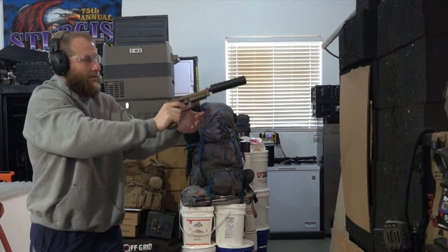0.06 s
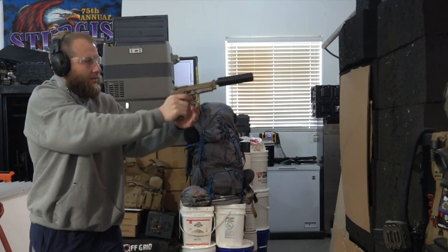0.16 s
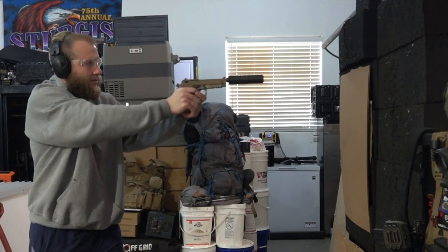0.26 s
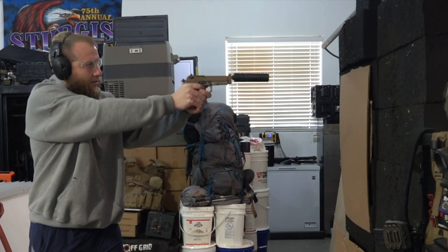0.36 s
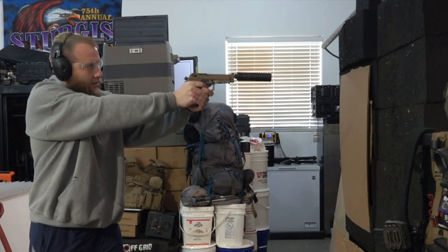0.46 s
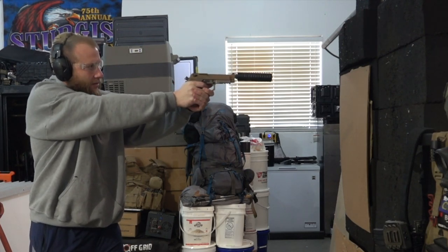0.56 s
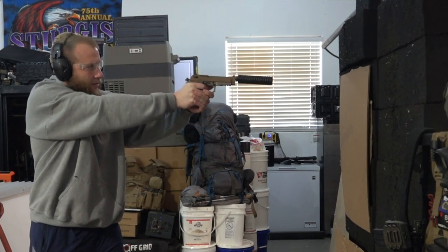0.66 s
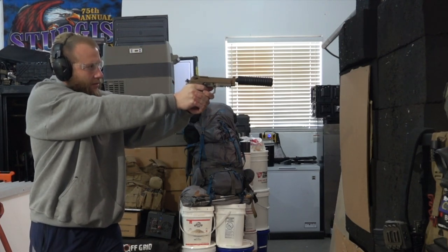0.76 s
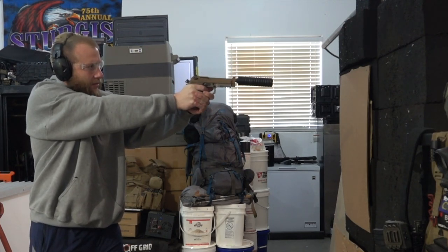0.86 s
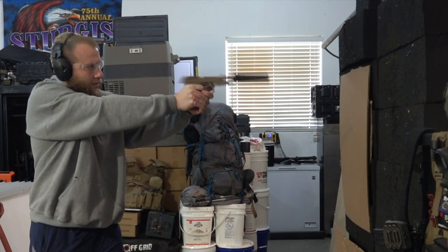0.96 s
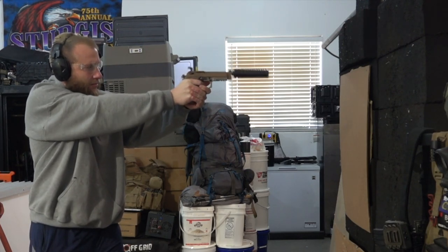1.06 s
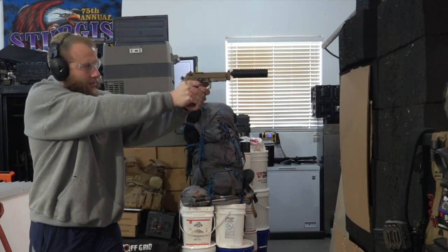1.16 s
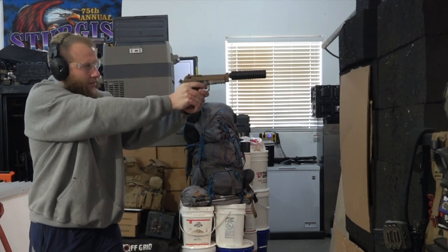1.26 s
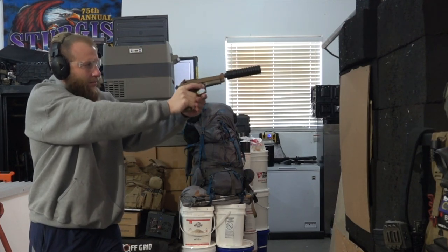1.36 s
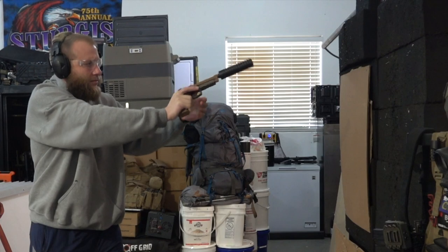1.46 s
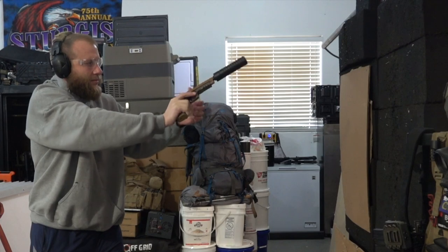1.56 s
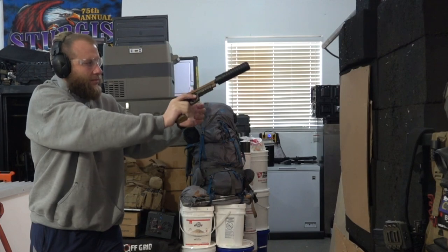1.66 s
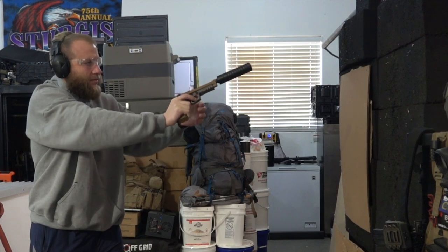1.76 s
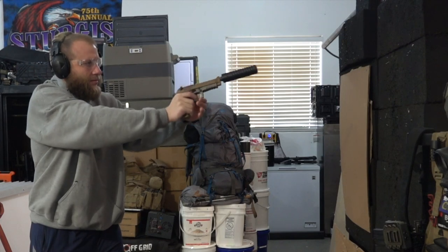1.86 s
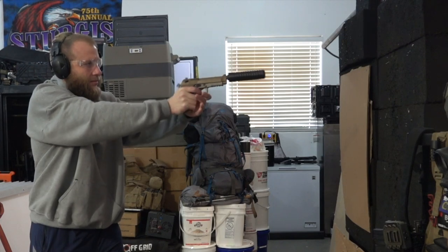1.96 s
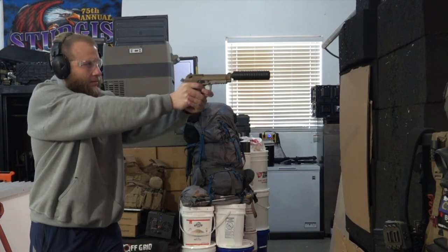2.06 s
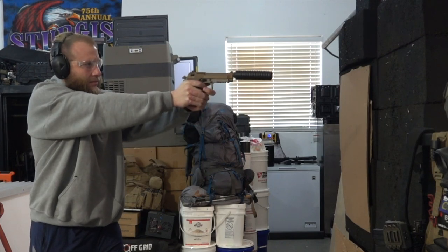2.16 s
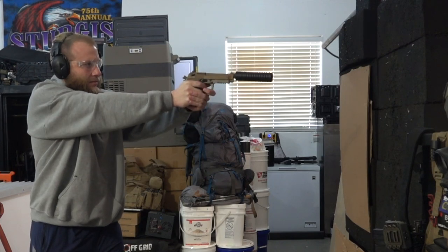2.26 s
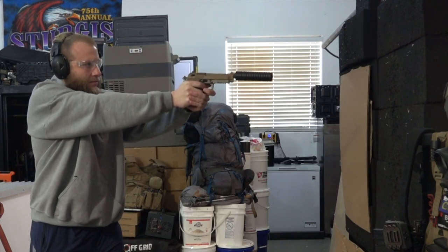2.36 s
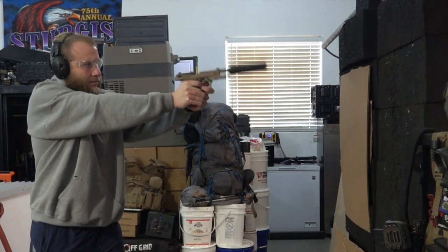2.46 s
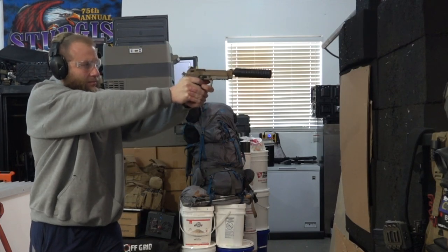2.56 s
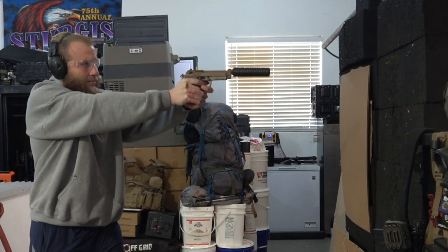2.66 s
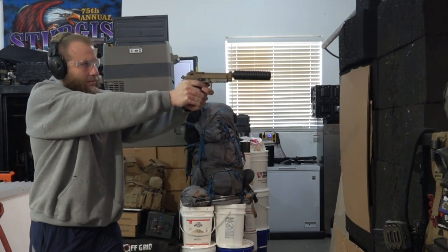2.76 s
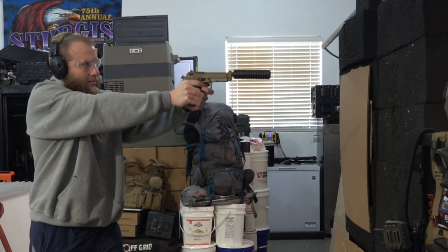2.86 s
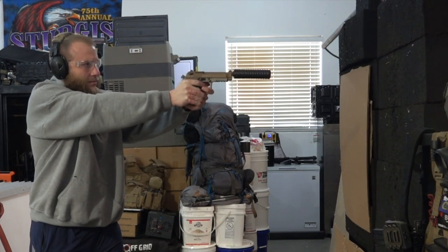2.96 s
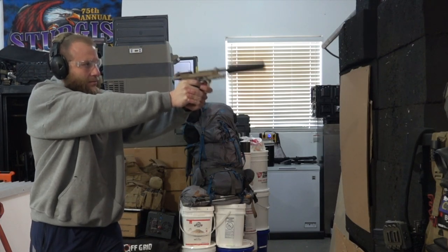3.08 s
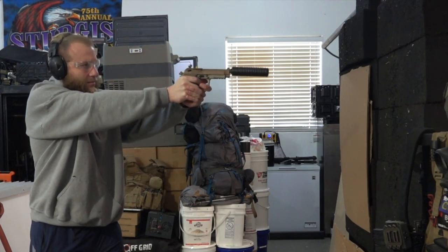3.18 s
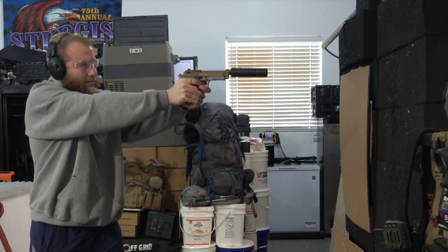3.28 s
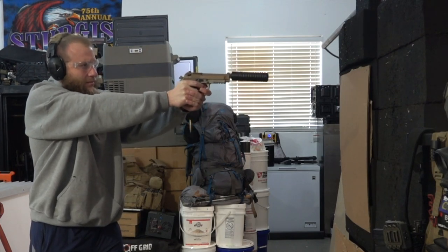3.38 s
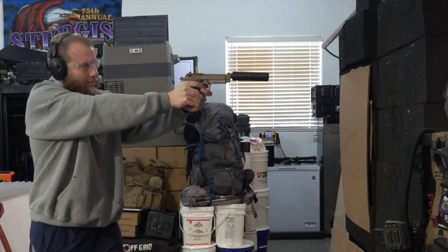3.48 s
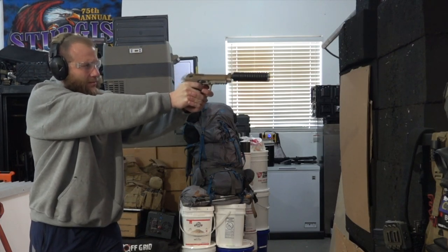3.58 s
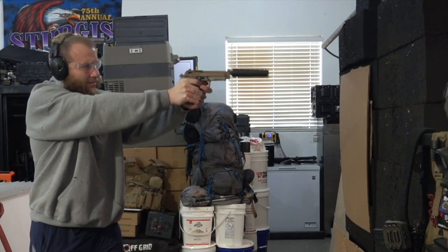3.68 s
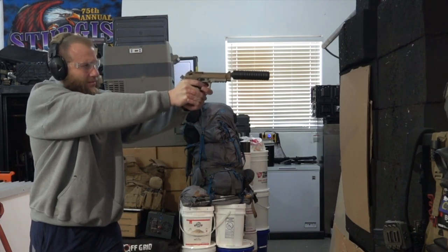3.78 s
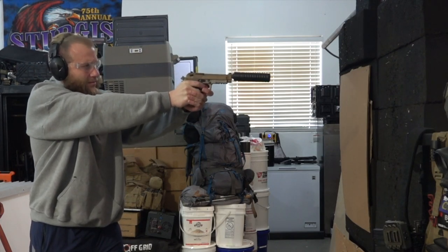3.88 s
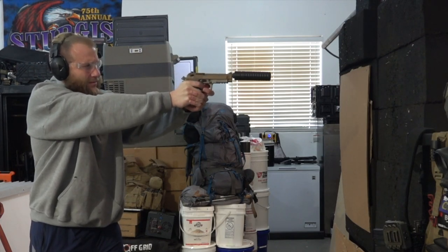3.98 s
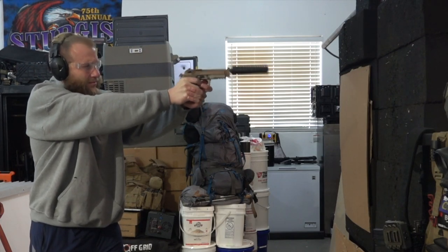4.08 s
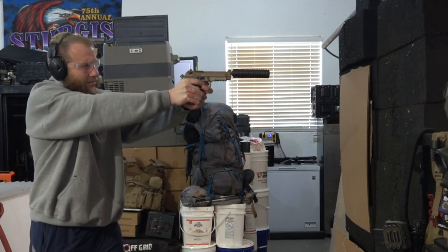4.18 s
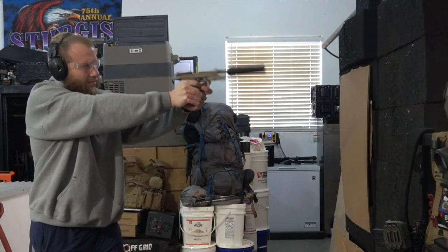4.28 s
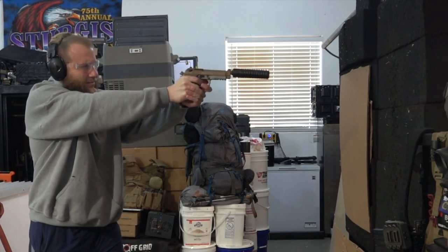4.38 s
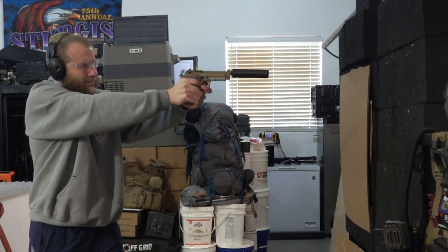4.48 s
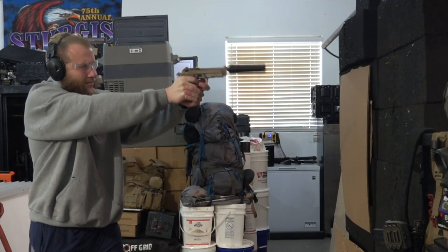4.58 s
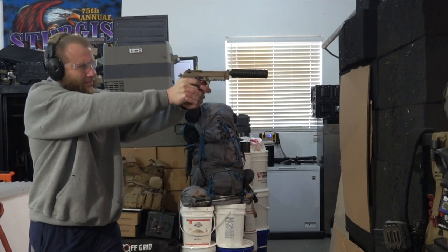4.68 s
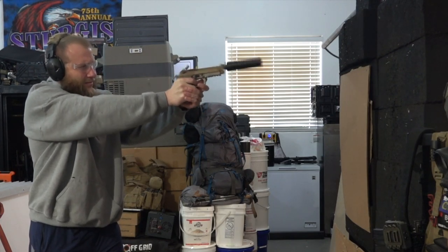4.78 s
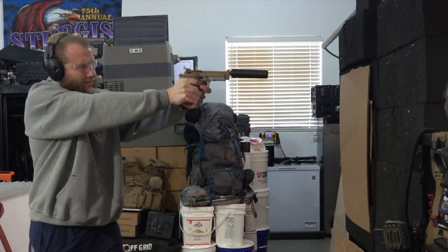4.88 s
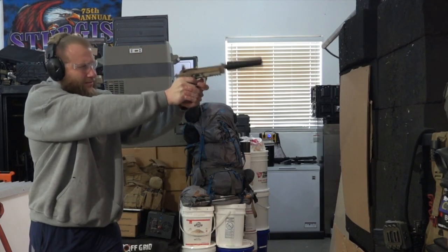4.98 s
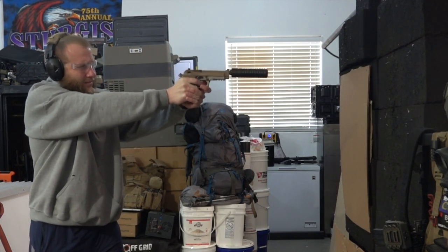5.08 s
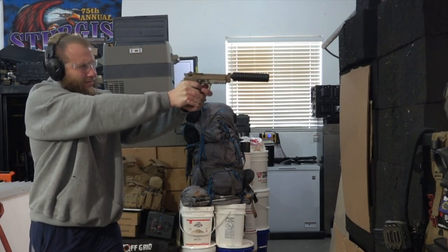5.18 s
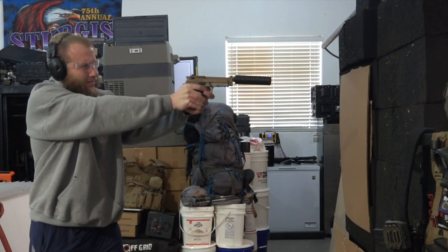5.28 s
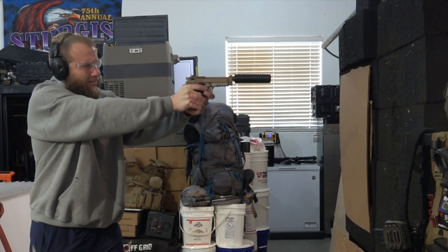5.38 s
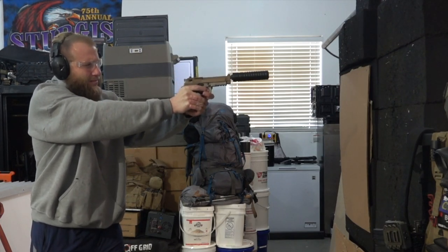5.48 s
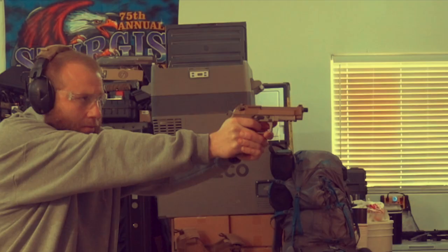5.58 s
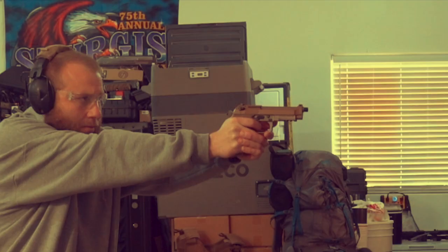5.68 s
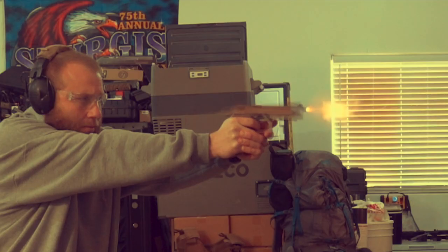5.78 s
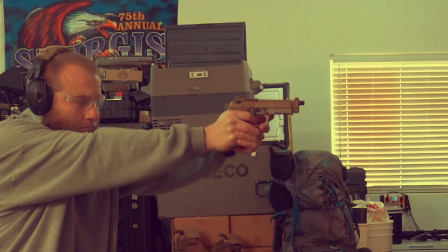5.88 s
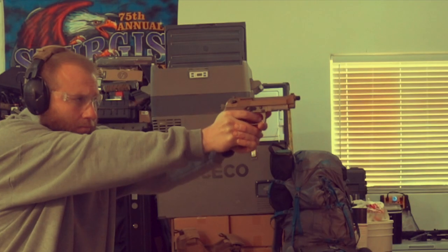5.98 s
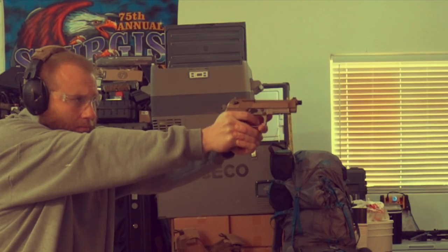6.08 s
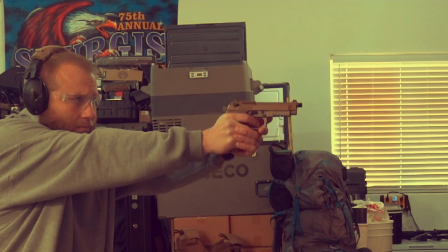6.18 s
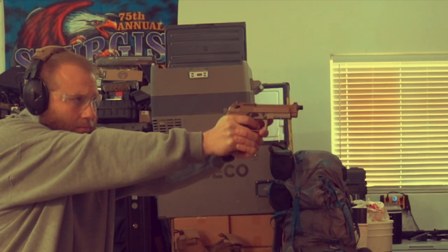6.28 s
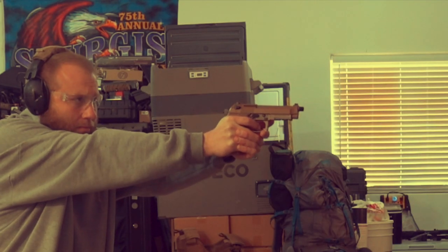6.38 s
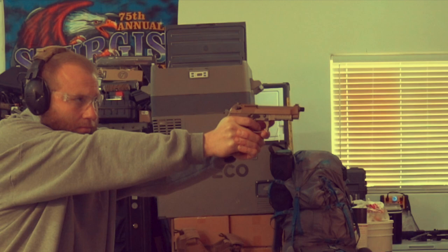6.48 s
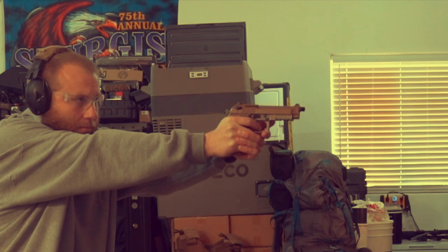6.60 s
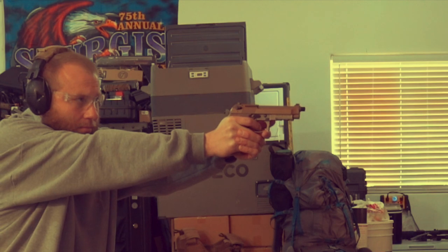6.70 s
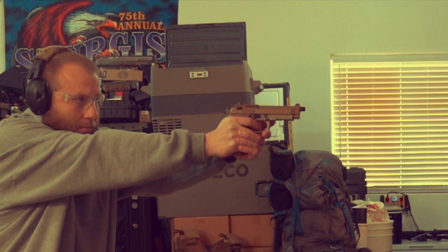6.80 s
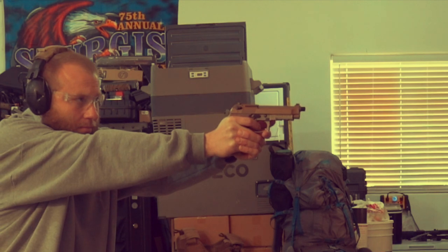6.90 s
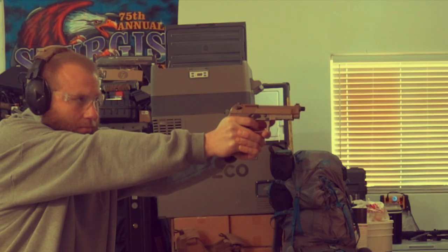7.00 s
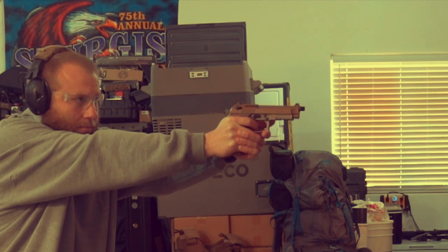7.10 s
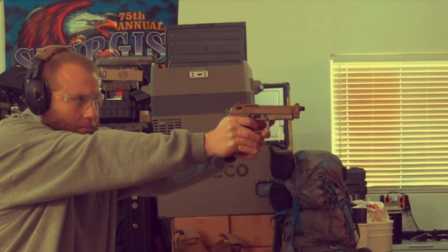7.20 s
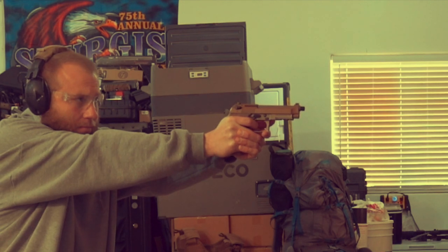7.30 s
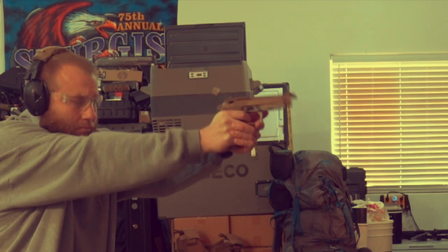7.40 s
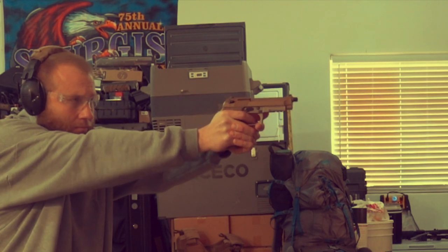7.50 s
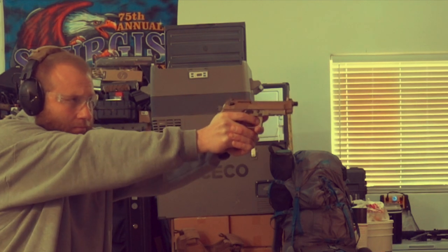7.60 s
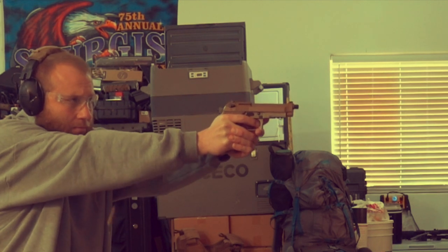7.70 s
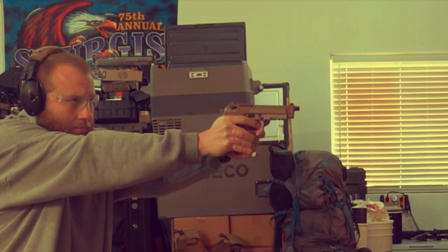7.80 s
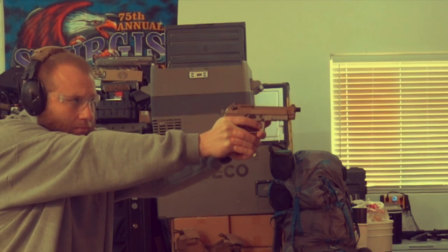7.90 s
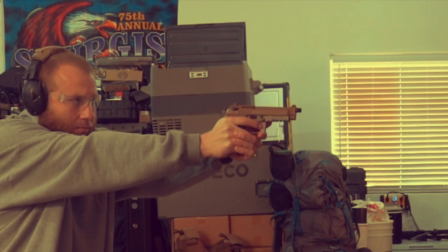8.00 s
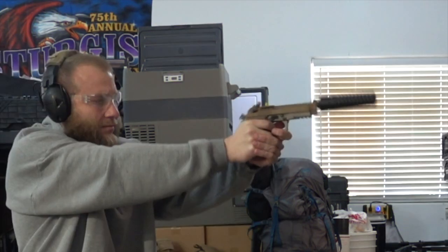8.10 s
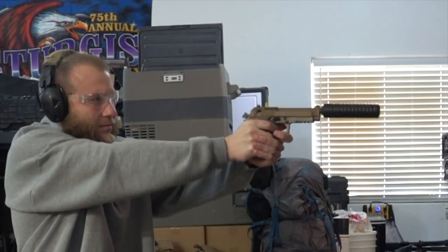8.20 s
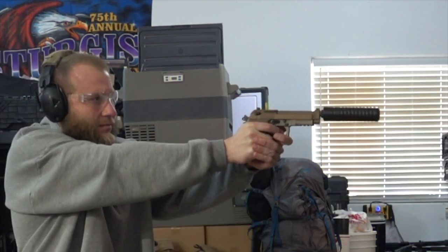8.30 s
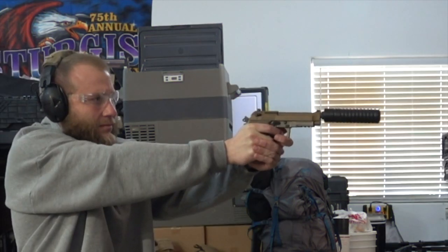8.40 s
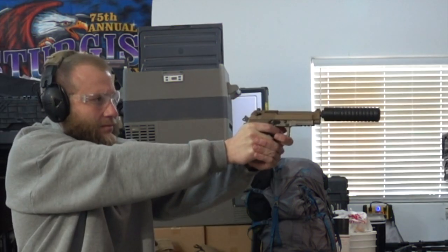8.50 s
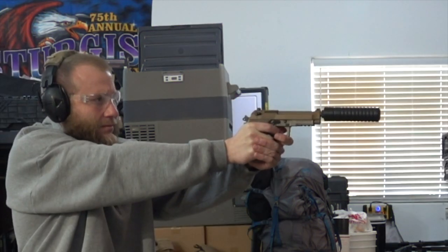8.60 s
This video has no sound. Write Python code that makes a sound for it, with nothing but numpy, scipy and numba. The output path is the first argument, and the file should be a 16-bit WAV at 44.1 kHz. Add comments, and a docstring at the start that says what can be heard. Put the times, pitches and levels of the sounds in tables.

```python
"""A pistol slide is let go by hand in a small workshop; after trigger ticks come nine shots through a suppressor,
each a noise burst with a tube whistle, a slide crack and modes; brass cases bounce as clicks and beating modes.
From nearer come two shots without it: louder bursts over low room modes; steel cabinets ring on as decaying noise.
Last, the second shot is heard again from afar. Throughout, the microphone input overloads on the blasts,
and a limiter ducks, holds and lets go, so each tail swells once more."""
import sys
import numpy as np
from scipy import signal
from scipy.io import wavfile
from numba import njit

SR = 44100
rng = np.random.default_rng(int(sys.argv[2]) if len(sys.argv) > 2 else 0)


def waveform_to_disk(signal):
    """Save audio, clipped to [-1, 1], as 16-bit WAV at the path in sys.argv[1]."""
    frames = np.transpose(np.atleast_2d(signal))
    scaled = np.clip(frames, -1, 1) * 32767
    samples = np.round(scaled).astype(np.int16)
    wavfile.write(sys.argv[1], SR, samples)


def elevation(decibels):
    """Turn decibel levels (scalar or array-like) into linear amplitude ratios."""
    levels = np.asarray(decibels, float)
    return 10 ** (levels / 20)


N = 381465  # length [samples]

# shots through the suppressor: (time [s], relative tube whistle [dB], hammer [dB], slide crack [dB],
# leading slide mode [Hz])
MUFFLED = [(1.0014, -5.5, -19.5, -17, 12500), (2.4883, -7, -19.5, -7, 11500),
           (3.1093, -30.5, -25, -4, 8500), (3.635, 2, -21, -7, 9640), (4.0458, 1.5, -22, -13, 11000),
           (4.315, -0.5, -17.5, -8, 12500), (4.546, 2, -29, -7.5, 11000),
           (4.7685, -2.5, -28.5, -11.5, 11000), (4.9681, -3, -22, -6.5, 11000)]
# shots from the bare muzzle: (time [s], blast [dB], hammer [dB], boom [dB])
OPEN = [(5.8308, 33, -3.5, 16.5), (7.3768, 32.5, -16, 14)]
# colour of the muffled blast's reverberant tail: (frequency [Hz], density [dB per Hz])
MUFFLED_TAIL = [(24, -69.5), (40, -41), (354, -15), (392, -16), (455, -15), (873, -11), (990, -7.5),
                (1240, -8.5), (1680, -5), (5440, -5.5), (6170, -6), (16000, -27.5)]
# decay of the room: (frequency [Hz], t60 [s])
ROOM_DECAY = [(100, 0.39), (260, 0.36), (700, 0.42), (1840, 0.46), (4850, 0.44), (12800, 0.27)]


def to_unit_rms(x):
    """Scales to rms 1."""
    return x / np.sqrt(np.mean(x ** 2) + 1e-20)


def read(points, hz):
    """Reads a table on a log-frequency axis."""
    f, value = np.transpose(points)
    return np.interp(np.log(hz + 1), np.log(f + 1), value)


def add(mix, s, sound):
    """Mixes a sound in at time s."""
    part = mix[..., round(s * SR):][..., :sound.shape[-1]]
    part += sound[..., :part.shape[-1]]


def coloured(x, points, age=0.):
    """Causal filter of energy 1; age [s] undoes the room decay that a colour taken from a tail already holds."""
    hz = abs(np.fft.fftfreq(4096, 1 / SR))
    level_db = np.maximum(read(points, hz), -70) + 60 * age / read(ROOM_DECAY, hz)
    log_gain = np.log(elevation(level_db))
    minimum_phase = -signal.hilbert(log_gain).imag
    taps = np.fft.ifft(np.exp(log_gain + 1j * minimum_phase)).real[:2048]
    taps /= np.linalg.norm(taps)
    return signal.fftconvolve(np.atleast_2d(x), taps[None], axes=1)[:, :x.shape[-1]]


def burst(t60, seconds=.12):
    """Row 0: a blow smeared into noise by the nearest surfaces. Row 1: an impulse of like energy, for the room."""
    fade = elevation(-60 * np.arange(round(seconds * SR)) / SR / t60)
    smeared = rng.standard_normal(len(fade)) * fade
    bare = np.linalg.norm(fade) * signal.unit_impulse(len(fade))
    return np.array([smeared, bare])


def resonate(x, hz, width):
    """Two-pole resonance of gain 1 at its peak."""
    return signal.lfilter(*signal.iirpeak(hz, hz / width, SR), x)


def ring(hz, t60):
    """One struck mode: a sine that dies away exponentially."""
    t = np.arange(SR // 2) / SR
    return elevation(-60 * t / t60) * np.sin(2 * np.pi * hz * t)


def room(x, wet_db):
    """Direct sound and two dense tails, each band dying at its own speed; their blend differs from blow to blow."""
    turn_hz, build_up_s = .45, 0.0037
    hz, t, z = signal.stft(rng.standard_normal((2, SR)), SR, nperseg=256)
    decay = elevation(-60 * t / read(ROOM_DECAY, hz)[:, None])
    tail = signal.istft(z * decay, SR, nperseg=256)[1]
    tail *= np.minimum(np.arange(tail.shape[1]) / (build_up_s * SR), 1)
    tail /= np.linalg.norm(tail[0])
    turn = 2 * np.pi * turn_hz * np.arange(N) / SR
    send = x[1] * np.array([np.cos(turn), np.sin(turn)])
    wet = signal.oaconvolve(send, tail, axes=1)[:, :N].sum(axis=0)
    return x[0] + elevation(wet_db) * wet


def air(points, db, lines):
    """Steady coloured room noise with sines of mains hum."""
    t = np.arange(N) / SR
    noise = to_unit_rms(coloured(rng.standard_normal(N), points)[0])
    hum = sum(np.sqrt(2) * elevation(d) * np.sin(2 * np.pi * (hz * t + rng.random())) for hz, d in lines)
    return elevation(db) * noise + hum


def cabinets(during):
    """Sheet steel, shaken by each blast, rings for seconds; the thin muffled blasts hardly reach its lower modes."""
    # long modes: (frequency [Hz], relative level [dB])
    long_modes = [(398, -74), (500.6, -59), (613.7, -59), (690, -63), (721.4, -55.5), (834.4, -65.5),
                  (1287, -63.5), (1561, -62), (1690, -63.5), (1949, -63.5), (2148, -72.5), (2353, -67.5),
                  (2557, -75)]
    # dense modes: (frequency [Hz], relative density [dB per Hz])
    dense_modes = [(150, -41), (250, -11), (353, -27.5), (488, -4), (571, -14), (597, -5.5), (698, -8),
                   (780, -16), (816, -1.5), (1130, -8.5), (1970, -6), (2630, -5), (3600, -23),
                   (4680, -60.5), (7920, -120)]
    out, t = np.zeros(N), np.arange(3 * SR) / SR

    def wash():
        """Many modes too close to tell apart: coloured noise."""
        return to_unit_rms(coloured(rng.standard_normal(len(t)), dense_modes)[0])

    for s, db, *_ in during(OPEN):
        modes = sum(elevation(d) * resonate(rng.standard_normal(len(t)), hz, 10) for hz, d in long_modes)
        fast, slow = elevation(db - 44.5 - 60 * t / 1.316), elevation(db - 78.0 - 60 * t / 6)
        add(out, s, wash() * (fast + slow))
        add(out, s, to_unit_rms(modes) * elevation(db - 67.0 - 60 * t / 4.75))
    for s, *_ in during(MUFFLED):
        add(out, s, resonate(wash(), 3600, 1800) * elevation(-43 - 60 * t / 1.7))
    return out


def ticks(during):
    """Small clicks of trigger and grip, and the knock of what the cases land on: resonant bursts, lower ones ring more."""
    # (time [s], relative level [dB], frequency [Hz])
    tick_rows = [(.61, -48, 2500), (.621, -46, 3500), (.646, -35, 800), (.648, -49, 2200),
                 (2.99, -46.5, 3444), (3.086, -33, 5000), (3.607, -29, 3600), (4.016, -39, 11250),
                 (4.292, -26, 12110), (5.352, -13.5, 770), (5.437, -19, 560)]
    direct_and_room = elevation([[1.5], [-4]])
    out = np.zeros((2, N))
    for s, db, hz in during(tick_rows):
        width = min(hz ** 2 / 7000, hz)
        add(out, s, elevation(db) * resonate(burst(0.011, .06), hz, width) * direct_and_room)
    return out


def cases(during):
    """Each brass bounce: a click, a beating pair of wall modes and a short hollow puff; also two harder knocks."""
    # bounces: (time [s], relative click [dB], wall ring [dB], hollow [dB])
    bounces = [(1.245, -22, -65, -46), (1.672, -12, -51, -18), (2.073, -17, -41, -19),
               (2.456, -22.5, -48, -19.5), (2.793, -44, -45, -50), (2.939, -39, -50, -56),
               (2.99, -55, -48, -58), (3.027, -60.5, -54, -37.5), (3.857, -21, -37, -45),
               (4.7, -29.5, -47, -43.5), (5.256, -23, -38, -43), (5.352, -18, -50, -45),
               (5.411, -21, -37, -16.5), (5.437, -18, -52, -39), (5.502, -31, -52, -28),
               (6.6, -35.5, -57, -44), (6.645, -31, -55, -39), (6.706, -35, -55, -26),
               (6.74, -34, -64, -41), (7.012, -27, -45.5, -35.5), (7.26, -28.5, -38.5, -32),
               (7.68, -43.5, -55, -37)]
    # each case has its own wall note: (time from which it bounces [s], frequency [Hz])
    wall_notes = [(1.2, 10444), (2.0, 10520), (3.8, 10310), (4.6, 10430), (5.4, 10350), (6.5, 10585)]
    # air inside a case: (frequency [Hz], width [Hz], relative level [dB])
    hollow = [(5180, 420, 1.5), (5960, 1600, -20)]
    # a case strikes something hard close by: (time [s], level [dB], t60 of the crack [s])
    knocks = [(5.1835, -7.5, 0.0078), (6.448, -6, 0.11)]
    # colour of the knocks: (frequency [Hz], density [dB per Hz])
    knock_colour = [(59, -53), (100, -23), (373, -25.5), (492, -17), (1650, -12), (2800, -12),
                    (3250, -10.5), (11600, -14.5), (16000, -19.5)]
    # thin steel rings under the first knock: (time [s], relative level [dB])
    clangs = [(5.184, -18.5)]
    # modes of that steel: (frequency [Hz], relative level [dB], t60 [s])
    steel = [(8620, -2, 0.091), (11080, -13, 0.084), (11060, 11, 0.023), (11000, -1.5, 0.054)]
    out = np.zeros((2, N))
    for s, db, ring_db, hollow_db in during(bounces):
        hz = [f for first, f in wall_notes if first <= s][-1]
        click = resonate(burst(0.0024, .02), 9600, 8400)
        wall = ring(hz, 0.2) + 1.7 * ring(hz + rng.uniform(8, 55), 0.19)
        puff = sum(elevation(d) * resonate(burst(0.073), f, width) for f, width, d in hollow)
        floor = resonate(burst(0.0073, 0.018), 1000, 1600)
        add(out, s, elevation(db) * click * elevation([[5], [-1]]))  # direct and room send [dB]
        add(out, s, elevation(ring_db) * wall * elevation([[-4], [3]]))
        add(out, s, elevation(hollow_db) * puff)
        add(out, s, elevation(db - 15) * floor)
    for s, db, t60 in during(knocks):
        add(out, s, elevation(db) * coloured(burst(t60), knock_colour))
    for s, db in during(clangs):
        add(out, s, elevation(db) * sum(elevation(d) * ring(hz, t60) for hz, d, t60 in steel))
    return out


def slide(during):
    """A bright crack, then the modes of the slide; where the blow lands decides which of them lead."""
    # modes of the slide: (frequency [Hz], relative level [dB], t60 [s])
    slide_modes = [(7800, -7.5, .1), (8420, -4, 0.08), (8610, -4, .1), (10860, -3, 0.14),
                   (11640, -8.5, 0.11), (12500, 3.5, 0.17)]
    # low modes of the pistol frame: (frequency [Hz], level [dB], t60 [s])
    frame_modes = [(2010, -36, 0.072), (2900, -35, .06), (4500, -30, .03)]
    # the slide is let go by hand: (time [s], relative crack [dB], slide ring [dB], leading mode [Hz]),
    # then the colour of that crack: (frequency [Hz], density [dB per Hz])
    rack = [(0.0005, -13, -36, 12500)], [(180, -56), (300, -27), (614, -23), (762, -23), (1060, -12),
            (1250, -15), (1970, -1.5), (2280, -9.5), (2880, 0.5), (3190, -2), (6850, -12), (7950, -9),
            (11700, -22), (12900, -17.5), (16000, -23.5)]
    return_s, ring_under_crack_db = .0555, -6  # the return follows the blast
    focus_db = 21  # loss per octave from the leading mode
    out = np.zeros((2, N))

    def modes(lead_hz):
        """The slide's modes, weaker the further they lie from the leading one."""
        loss = lambda hz: focus_db * abs(np.log2(hz / lead_hz))
        return sum(elevation(d - loss(hz)) * ring(hz, t60) for hz, d, t60 in slide_modes)

    for s, _, _, db, lead_hz in during(MUFFLED):
        add(out, s + return_s, elevation(db) * coloured(burst(0.016), MUFFLED_TAIL, .3))
        add(out, s + return_s, elevation(db + ring_under_crack_db) * modes(lead_hz))
    releases, crack_colour = rack
    for s, db, ring_db, lead_hz in during(releases):
        crack = coloured(burst(0.018), crack_colour, .06)
        frame = sum(elevation(d) * ring(hz, t60) for hz, d, t60 in frame_modes)
        add(out, s, elevation(db) * crack * elevation([[-8], [0.5]]))  # direct and room send [dB]
        add(out, s, elevation(ring_db) * modes(lead_hz) + frame)
    return out


def hammer(delay, db):
    """The sear lets go with a dull tick; the hammer lands with a bright one after the delay [s]."""
    out = np.zeros((2, round(0.045 * SR)))
    add(out, 0, elevation(db - 8.5) * resonate(burst(0.057, .03), 2200, 2800))
    add(out, delay, elevation(db) * resonate(burst(0.0046, .02), 10000, 12000))
    return out


def shots(during):
    """Gas bursts out over a low push of air (muffled shots only) and sets off the low modes of the room."""
    # resonance of the suppressor: (frequency [Hz], width [Hz])
    tube = [(6220, 250)]
    # colour of the open blast's reverberant tail: (frequency [Hz], density [dB per Hz])
    open_tail = [(24, -56.5), (40, -45), (185, -37), (412, -11), (455, -12.5), (570, -5.5), (1150, -4.5),
                 (1900, -3), (3300, -13.5), (4680, -14.5), (11000, -40.5), (16000, -70)]
    # low modes of the room: (frequency [Hz], relative level [dB], t60 [s])
    boom_modes = [(40, 4.5, 0.038), (154.4, 6.5, 0.1), (194, -8.5, 0.098), (299, -4, 0.22)]
    muffled_age_s, open_age_s = 0.17, 0.23  # how long after the blast the tail has its colour
    muffled_db, push_s = 8.5, 0.00039
    late_s, late_db = .315, -45  # a late cluster of echoes after each open blast
    out, t = np.zeros((2, N)), np.arange(2000) / SR
    boom = sum(elevation(db) * ring(hz, t60) for hz, db, t60 in boom_modes)
    push = (1 - t / push_s) * np.exp(-t / push_s)
    for s, tube_db, hammer_db, *_ in during(MUFFLED):
        gas = coloured(burst(0.068), MUFFLED_TAIL, muffled_age_s)
        gas += elevation(tube_db + 4.5) * sum(resonate(burst(0.14), hz, width) for hz, width in tube)
        add(out, s, elevation(muffled_db) * gas)
        add(out, s, elevation(-14.5) * push)
        add(out[0], s, elevation(-24.5) * boom)
        add(out, s - .007, hammer(0.0022, hammer_db))
    for s, db, hammer_db, boom_db in during(OPEN):
        add(out, s, elevation(db) * coloured(burst(0.046), open_tail, open_age_s))
        echoes = coloured(burst(0.22), open_tail, 0.033)[0]
        add(out[0], s + late_s, elevation(db + late_db) * echoes)
        add(out[0], s, elevation(boom_db) * boom)
        add(out, s - .0072, hammer(0.0076, hammer_db))
    return out


def stretch(start, end):
    """All that is struck between two times [s], in the room."""
    during = lambda rows: [row for row in rows if start <= row[0] < end]
    blasts = room(shots(during), 2.7)
    mechanism_and_knocks = room(slide(during) + ticks(during), -0.64)
    brass = room(cases(during), 0.87)
    return blasts + mechanism_and_knocks + brass + cabinets(during)


def scene():
    """Far, then near, then the second shot once more from far; each jump cuts off what still rings."""
    # room noise and hum at each position: noise colour (frequency [Hz], density [dB per Hz]),
    # noise level [dB rms], hum (frequency [Hz], level [dB rms])
    far_air = [(18, -57.5), (30, -24.5), (112, -13.5), (161, -20), (239, -7.5), (384, -15.5), (822, -21.5),
               (889, -19.5), (16000, -31.5)], -74, [(118.4, -84.5), (242.2, -84), (511.4, -95.5),
               (839.8, -89.5)]
    near_air = [(18, -50), (30, -26), (81, -23), (118, -7.5), (245, -15.5), (280, -10), (355, -11),
                (2120, -23.5), (16000, -34.5)], -66.5, [(118.4, -76.5), (242.2, -76.5)]
    # the listening position jumps: (time [s], crossfade [s])
    jumps = [(5.617, 0.023), (8.049, 0.023)]
    replay_s = 5.5889  # after the second jump, what sounded this long before is heard again
    t = np.arange(N) / SR
    a, b = (s - fade for s, fade in jumps)
    after_a, after_b = (np.clip((t - s) / fade + .5, 0, 1) for s, fade in jumps)
    far = stretch(0, a) + air(*far_air)
    near = stretch(a, b) + air(*near_air)
    again = np.roll(far, round(replay_s * SR))
    mix = far * (1 - after_a) + near * after_a * (1 - after_b) + again * after_b
    return np.array([mix, mix])


@njit
def limiter(x, ceiling, memory, fall, hold, rise):
    """Gain drops while recent peaks pass the ceiling, waits, then climbs back."""
    out, peak, gain, wait = np.empty_like(x), 0., 1., 0.
    for i in range(len(x)):
        peak = max(abs(x[i]), peak * memory)
        over = peak * gain / ceiling
        if over > 1:
            gain -= fall * gain * (1 - 1 / over)
            wait = hold
        elif wait > 0:
            wait -= 1
        else:
            gain += rise * (1 - gain)
        out[i] = x[i] * gain
    return out


def low_pass(x):
    """Removes everything above the highest recorded frequency."""
    return signal.sosfilt(signal.butter(12, 16370, fs=SR, output="sos"), x)


def record(dry):
    """The input clips, a capacitor blocks the lows, the limiter ducks, the converter clips; then the band limit."""
    knee = elevation(4.0)
    x = knee * np.tanh((abs(dry[0]) / knee) ** 3) ** (1 / 3) * np.sign(dry[0])
    x = signal.lfilter(*signal.butter(1, 30, "high", fs=SR), x)
    memory_s, fall_s, hold_s, rise_s = 0.0091, .004, 0.048, 0.0088
    x = limiter(x, ceiling=elevation(-5.5), memory=np.exp(-1 / (memory_s * SR)), fall=1 / (fall_s * SR),
                hold=hold_s * SR, rise=1 / (rise_s * SR))
    x = np.clip(x, -elevation(-0.85), elevation(-1.46))
    x = signal.oaconvolve(x, signal.firwin(511, 16100, window=("kaiser", 7), fs=SR), "same")
    return low_pass(np.array([x, x]))


dry = scene()
out = record(dry)
waveform_to_disk(out)
```